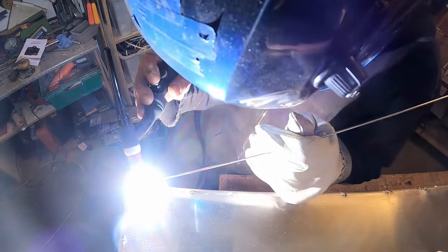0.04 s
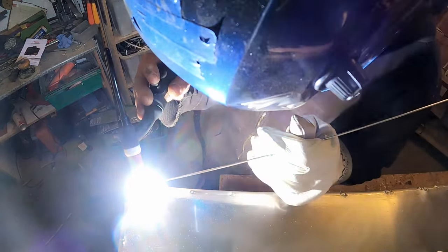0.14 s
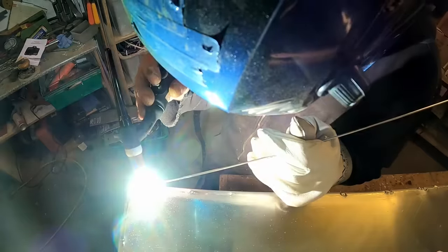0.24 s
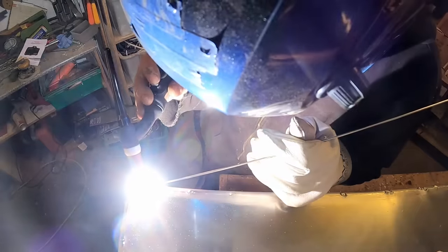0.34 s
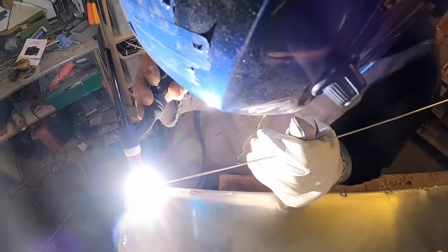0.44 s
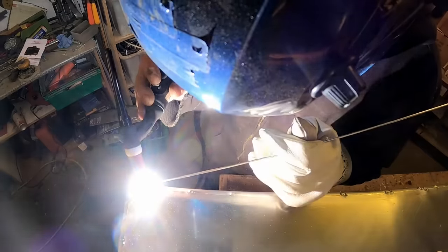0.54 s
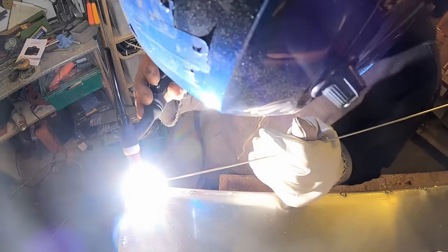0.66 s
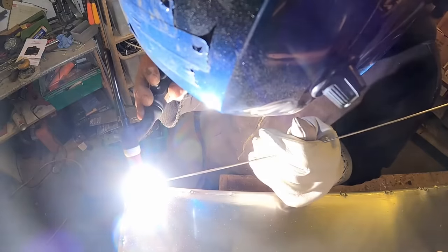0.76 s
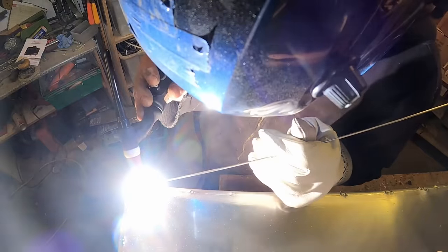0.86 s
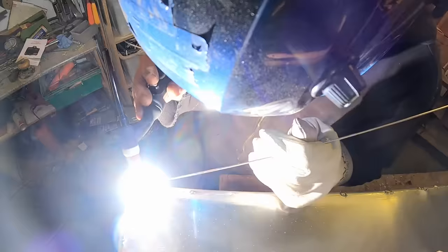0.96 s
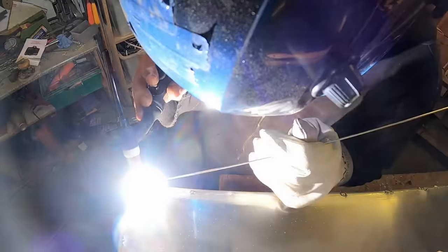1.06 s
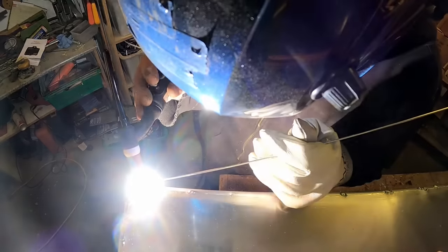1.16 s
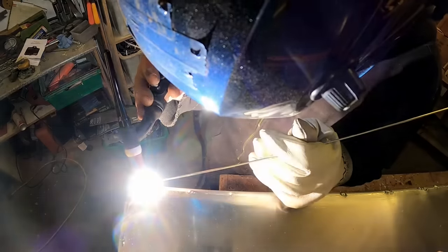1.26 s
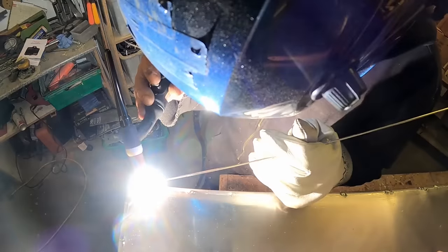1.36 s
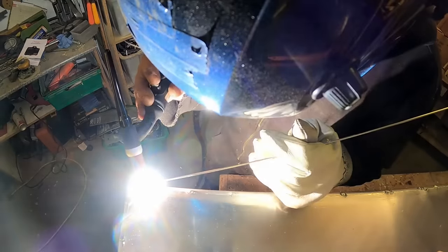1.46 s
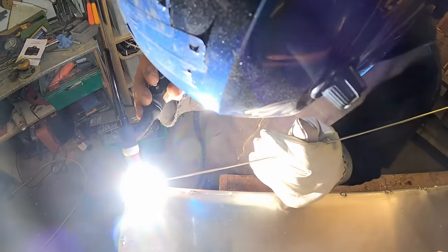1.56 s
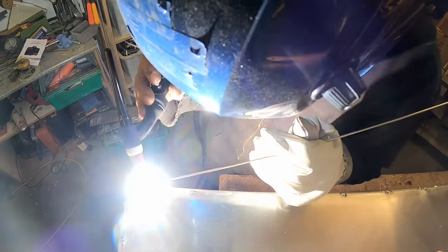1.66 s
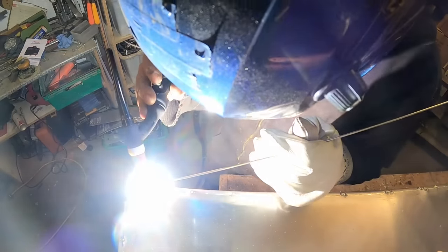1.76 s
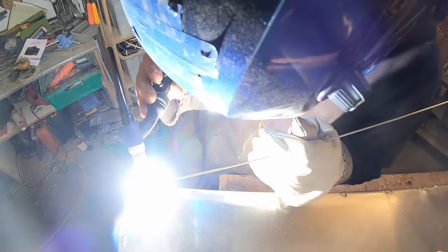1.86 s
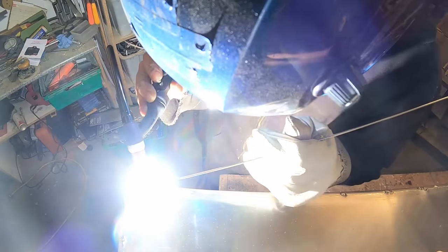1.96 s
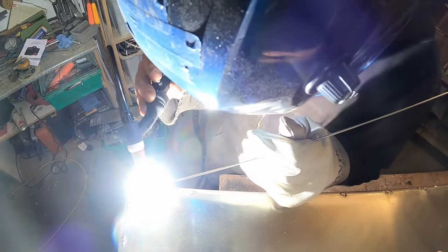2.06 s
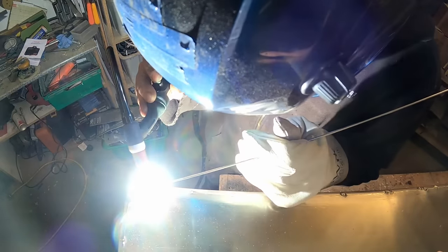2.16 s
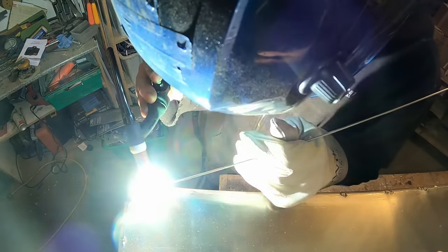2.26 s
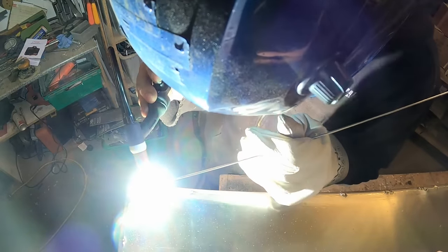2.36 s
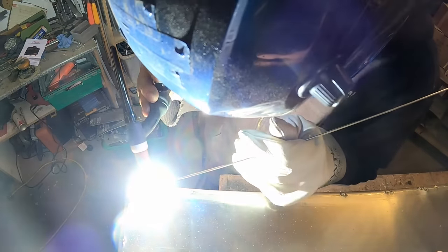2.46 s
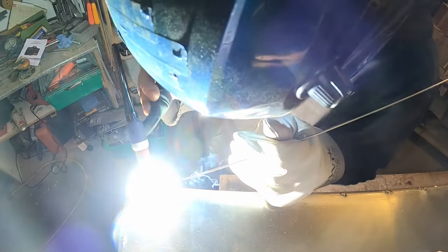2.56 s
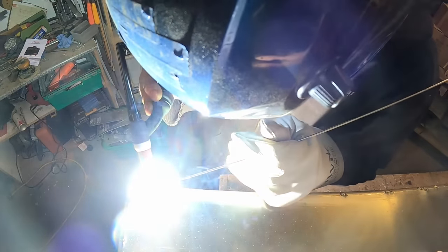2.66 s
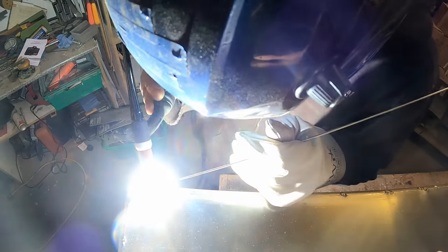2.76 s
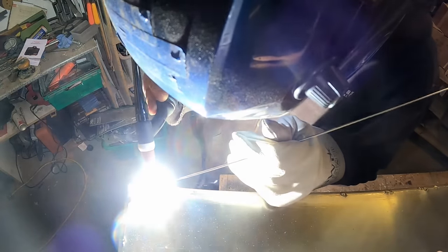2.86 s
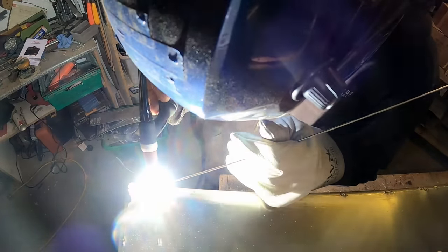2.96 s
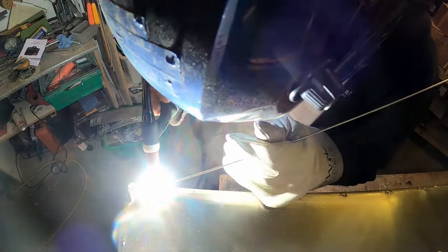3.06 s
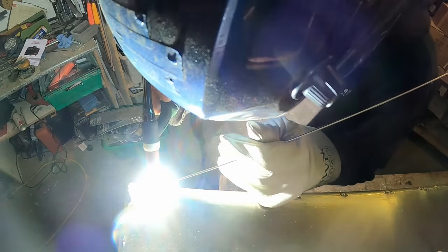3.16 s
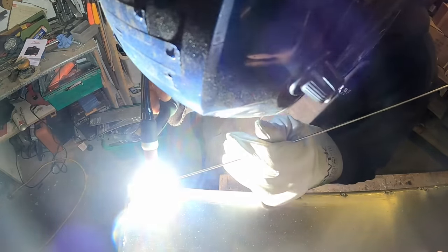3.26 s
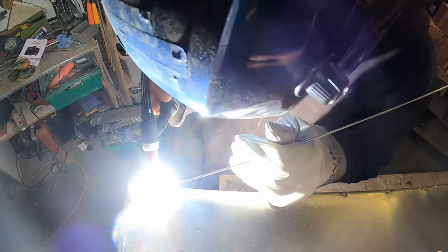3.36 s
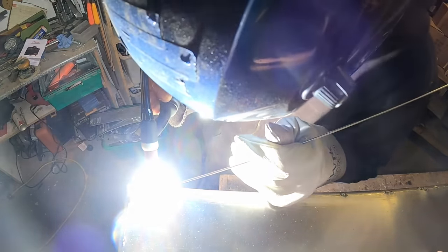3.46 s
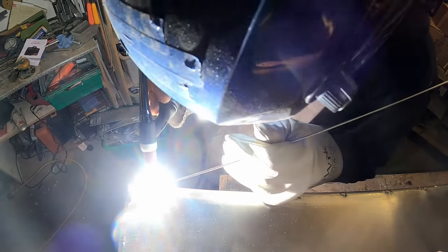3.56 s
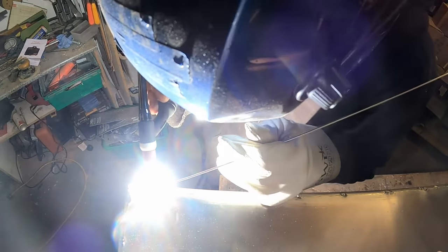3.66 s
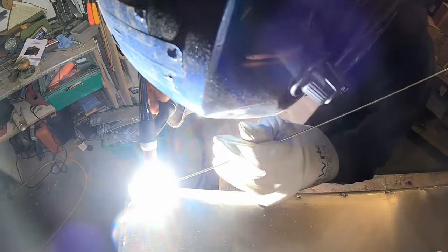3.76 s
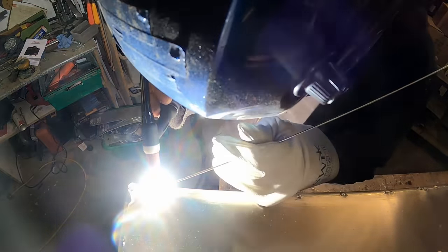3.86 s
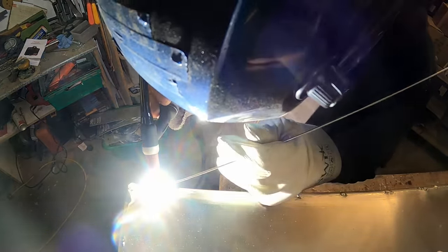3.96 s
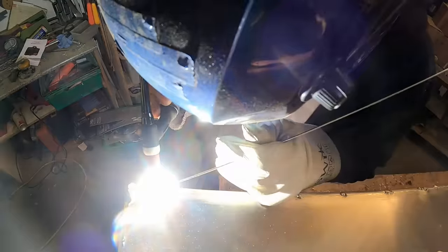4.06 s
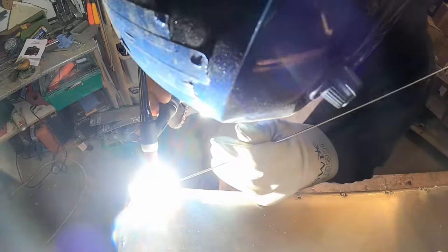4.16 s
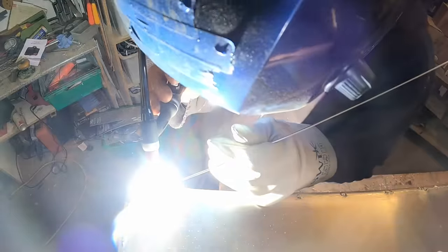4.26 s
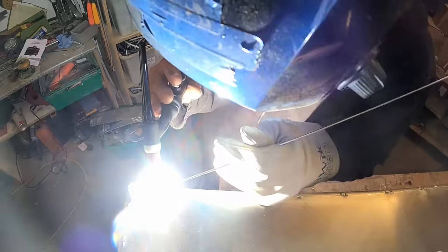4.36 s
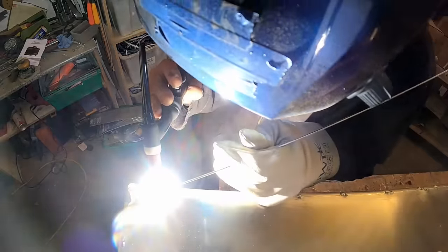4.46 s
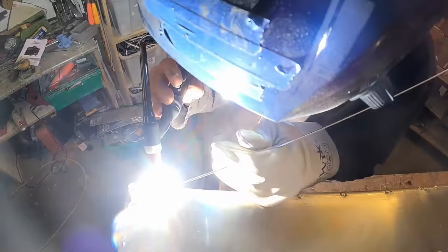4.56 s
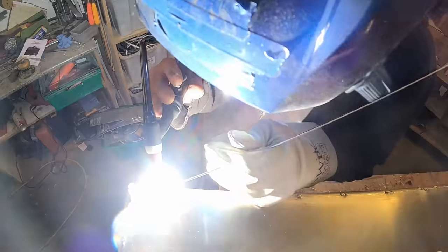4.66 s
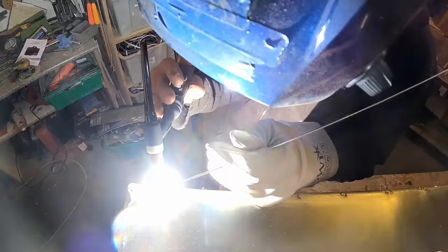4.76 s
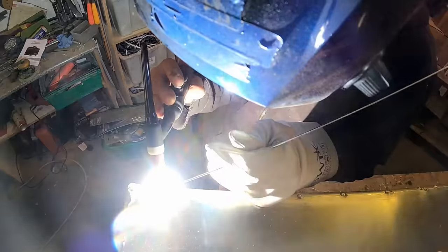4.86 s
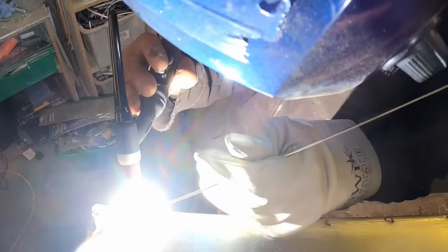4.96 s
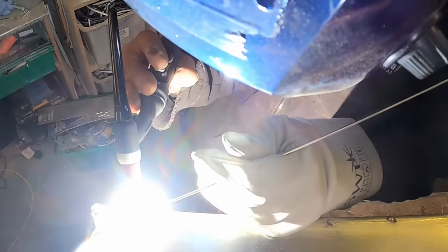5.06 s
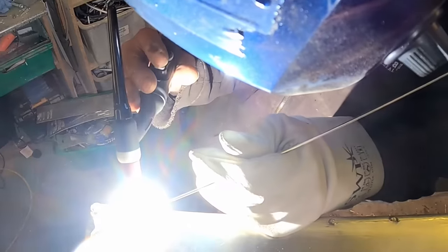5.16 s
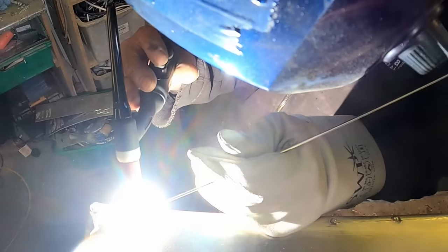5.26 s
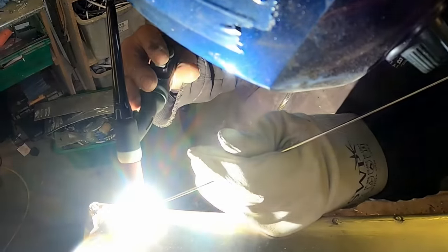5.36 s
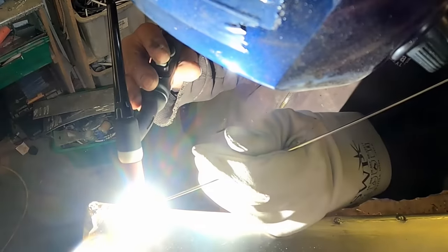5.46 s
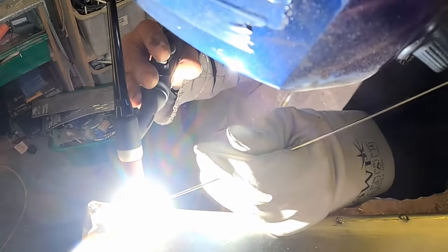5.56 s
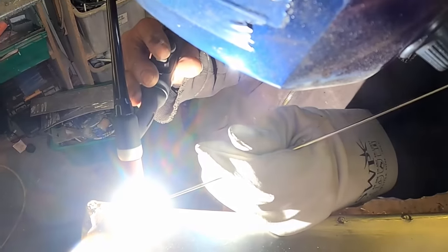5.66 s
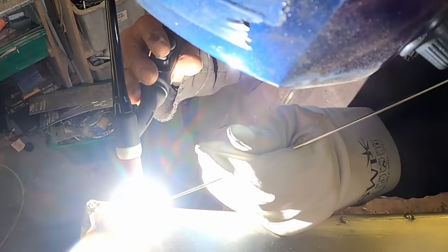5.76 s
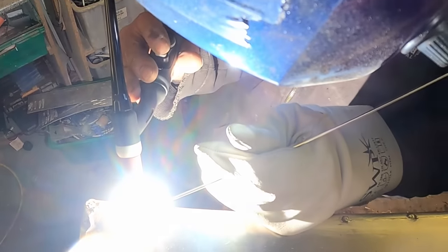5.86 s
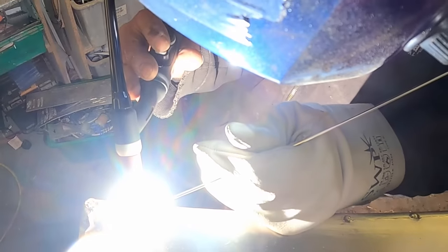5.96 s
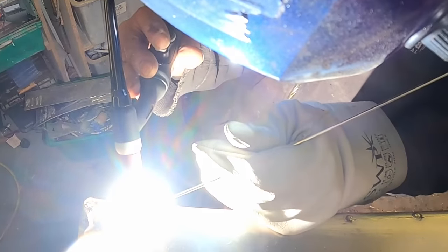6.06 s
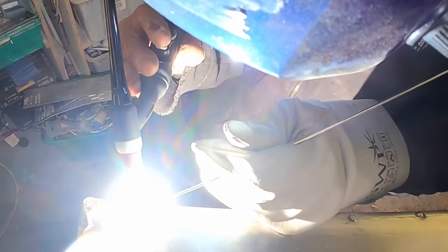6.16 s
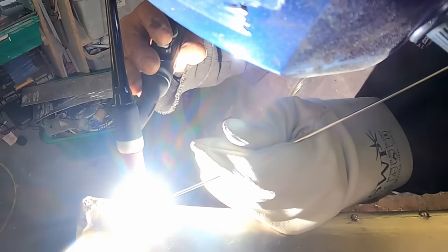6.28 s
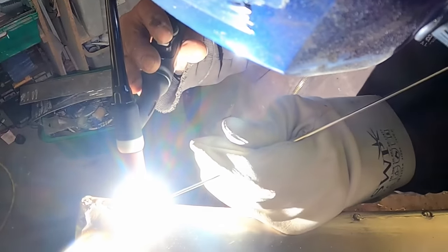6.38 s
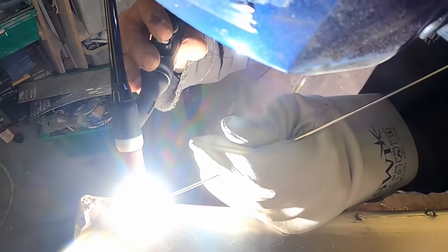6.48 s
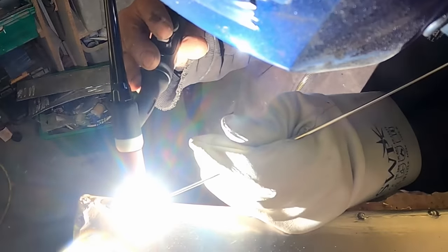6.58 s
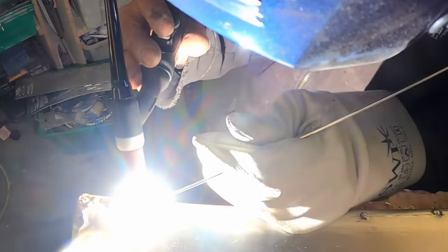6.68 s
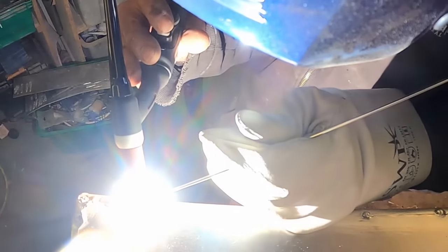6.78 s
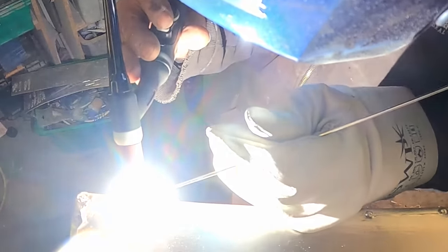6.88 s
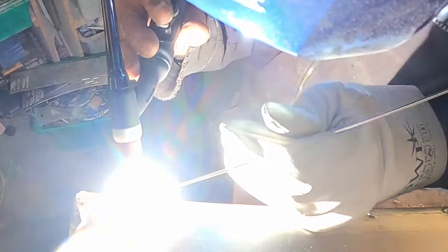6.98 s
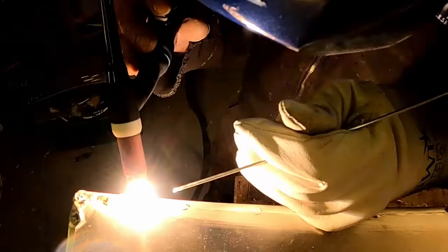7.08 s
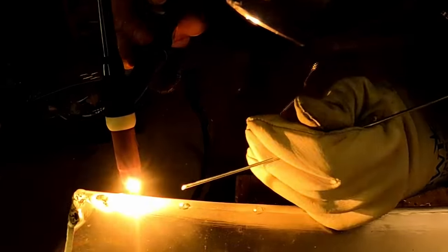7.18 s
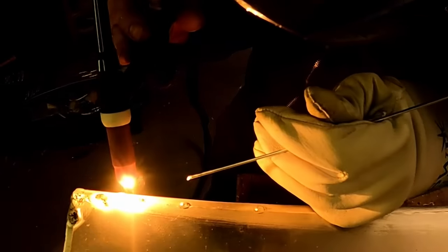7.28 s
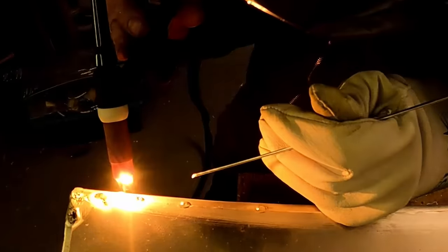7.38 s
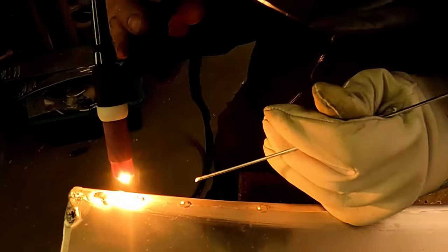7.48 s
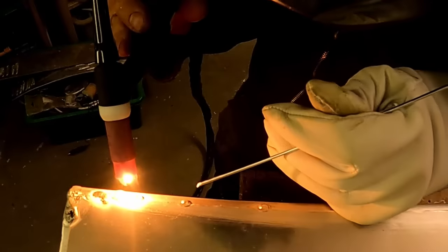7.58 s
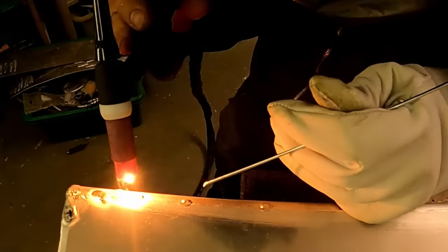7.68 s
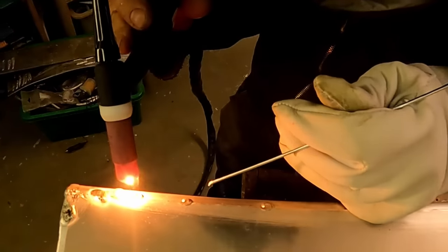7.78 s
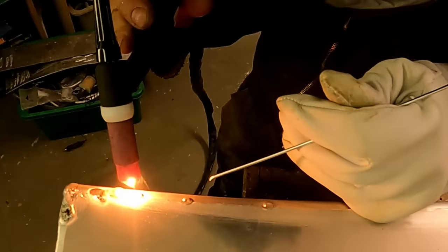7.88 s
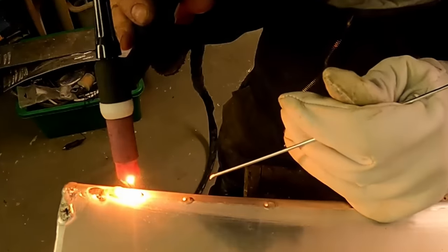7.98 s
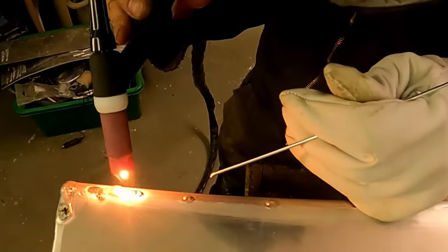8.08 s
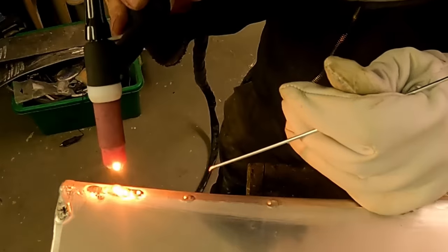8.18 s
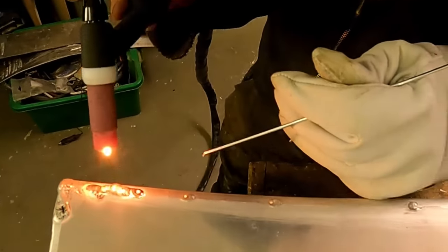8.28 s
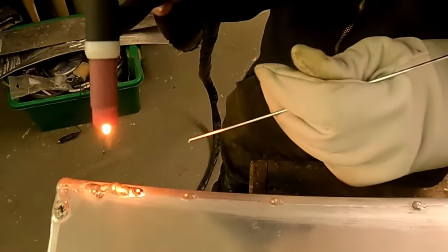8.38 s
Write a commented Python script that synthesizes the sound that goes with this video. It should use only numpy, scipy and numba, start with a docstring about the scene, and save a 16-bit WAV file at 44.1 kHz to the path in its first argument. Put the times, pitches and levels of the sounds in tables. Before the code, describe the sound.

Steady raspy low-pitched arc buzz with sizzling treble runs for seven seconds, cuts dead, and a soft fan whir and airy hiss rise behind it.

```python
"""Aluminium welding arc in a workshop

A phone half a metre from an alternating-current welding arc. The current reverses twice a cycle,
unevenly spaced; each time the arc dies, strikes again and settles, as a chain of pressure steps that cracks.
Plate, nearby surfaces and room filter and echo the cracks; noise bursts make the plasma hiss.
The arc is switched off; the room rings out and gain control lifts the welder's fan and shielding gas."""
import sys
import numpy as np
from scipy import signal
from scipy.fft import rfft, irfft
from scipy.io import wavfile
from scipy.ndimage import uniform_filter1d
from numba import njit

SR = 44100
rng = np.random.default_rng(int(sys.argv[2]) if len(sys.argv) > 2 else 0)


def dump_mix(stems):
    """Bounce the given channels to the path in sys.argv[1] as a 16-bit WAV at rate SR."""
    frames = np.atleast_2d(stems).T  # one column per channel
    limited = np.clip(frames, -1, 1)  # hard clip at full scale
    pcm = np.round(limited * 32767).astype(np.int16)
    wavfile.write(sys.argv[1], SR, pcm)


N = 371763

# Levels are those at the source, ahead of the microphone and its gain control.
ARC_OFF_S = 7.2900
# stretches of steady cycling: (first hard reversal [s], cycle rate [Hz])
CYCLING = [(.009466, 100.3607), (4.9616, 100.3758)]
# arc strength: (time [s], hard reversal [dB], restlessness of the arc root [dB])
ARC = [(0, -11, -2), (.85, -9, -2.5), (1.3, -11, 4.5), (2.06, -8.5, -4), (2.7, -8, -5), (3.2, -9.5, -1),
       (3.7, -8.5, -11), (4.3, -9.5, -4), (5.0, -7, -1), (5.6, -9, -4), (6.2, -9.5, -4), (7.2, -8, -6)]
# arc falters, perhaps as filler rod meets the pool:
# (time [s], length [s], added level of both reversals [dB], added restlessness [dB])
FALTERS = [(.119, 0.11, -0.5, 3), (.29, 0.2, -3, 6.5), (.548, 0.6, -1, 3), (.85, 0.48, -1.5, 2),
           (1.28, 0.44, -0.4, -5.5), (1.693, 0.23, -0.5, 0), (2.172, 0.065, -1.5, 6), (2.245, 0.13, -3, 6),
           (2.29, .16, -2, 9), (2.355, 0.13, -1, 0), (2.401, 0.33, -2.5, 6), (2.56, 0.056, -3, 10),
           (2.69, 0.103, -0.5, 9.5), (2.789, .11, -0.54, 6), (2.939, 0.18, 1, -1), (3.108, 0.11, -0.5, 4),
           (3.317, 0.15, 0.5, 1), (4.174, 0.12, -2, 10), (4.414, .14, -0.5, 5.5), (4.493, 0.11, -1, 6),
           (4.56, 0.17, -2, 5.5), (4.802, 0.28, -2, 1), (4.963, 0.34, -2, 2), (5.162, 0.15, -1.5, -7),
           (5.252, 0.18, -1, 5), (5.521, 0.06, -1.5, 8.5), (5.591, 0.18, -2.5, 7), (6.308, .12, 0, 5),
           (6.378, 0.13, 0, -1), (6.76, 0.14, -1, 7), (6.92, 0.22, -1, 4)]
# torch position: (time [s], edge sharpness [dB], dip where glove and plate shade the arc [Hz],
# dip depth before its limit [0-1], level around 11.8 kHz [dB])
TORCH = [(0, 3, 5800, 0.3, -8), (.36, 3.5, 5900, 0.3, -3), (.5, 3, 5640, 0.1, -1),
         (1.11, 8, 6440, 0.6, -3.5), (1.56, 0, 5730, 0.35, 5), (1.76, -0.5, 5598, 0.3, 2.5),
         (2.5, 5, 5000, 0.6, -4), (2.8, -1.5, 5200, 0.9, -8), (3.2, 3, 5250, 0.8, -2),
         (3.54, 4.5, 4940, 0.4, -12), (3.77, 0.5, 5200, 1, -8), (4.1, -2, 5460, .8, -7),
         (4.3, -4.5, 5700, 1, 0), (4.82, 0.5, 5902, 0.81, 2.5), (5.3, -2, 6000, 0.6, 3),
         (5.6, -3, 6040, 0.6, -4), (5.85, 0, 6000, .65, 4.5), (6.38, -2.5, 6000, 0.3, -3.5),
         (6.96, -1.5, 5860, 0.6, 6), (7.27, 5.5, 5750, 0.47, -4)]
# last sparks as the current runs down: (time [s], size of the main step [dB])
SPARKS = [(7.28275, -15), (7.28575, -19), (7.28935, -10)]


def undb(db):
    """Amplitude ratio of a level in dB."""
    return 10 ** (np.asarray(db) / 20)


def level(x, db):
    """Scale to an RMS level in dB."""
    return x * undb(db) / np.sqrt(np.mean(x ** 2))


def band(x, hz, width):
    """Resonance with gain 1 at its centre."""
    return signal.lfilter(*signal.iirpeak(hz, hz / width, SR), x)


def mode(x, hz, width):
    """A lightly damped mode: gain 1 at its centre, lagging the drive."""
    r, w = np.exp(-np.pi * width / SR), 2 * np.pi * hz / SR
    return signal.lfilter([0, 2 * (1 - r) * np.sin(w)], [1, -2 * r * np.cos(w), r * r], x)


@njit
def svf(x, hz, width):
    """Band-pass whose centre may move every sample."""
    y, b, l = np.empty(len(x)), 0., 0.
    for i in range(len(x)):
        g, k = np.tan(np.pi * hz[i] / SR), width / hz[i]
        v = (b + g * (x[i] - l)) / (1 + g * (g + k))
        b, l, y[i] = 2 * v - b, l + 2 * g * v, k * v
    return y


def colour(x, points, size=2048):
    """Causal filter through (Hz, dB) points, from the folded cepstrum."""
    hz, db = np.transpose(points)
    f = np.maximum(np.arange(size // 2 + 1) * SR / size, 1)
    cepstrum = irfft(np.log(undb(np.interp(np.log(f), np.log(hz), db))))
    cepstrum[1:size // 2] *= 2
    cepstrum[size // 2 + 1:] = 0
    return signal.fftconvolve(x, irfft(np.exp(rfft(cepstrum))))[:len(x)]


def walk(rate):
    """Random levels held 1 / rate s and slewed; spread near 1."""
    k = int(SR / rate)
    return uniform_filter1d(np.repeat(rng.standard_normal(N // k + 1), k), k)[:N]


def column(table, s):
    """Columns of a table whose first column is time, interpolated at times s."""
    t, *rest = np.transpose(table)
    return [np.interp(s, t, c) for c in rest]


def swells(table, s):
    """Each row rises to its values at its time and falls back; where rows overlap the strongest counts."""
    rise_share = 0.36  # of the length
    at, length, *rest = np.transpose(table)[:, :, None]
    late = (s - at) / length
    shape = np.clip(np.minimum(1 + late / rise_share, 1 - late / (1 - rise_share)), 0, 1)
    out = []
    for c in rest:
        strongest = np.abs(c * shape).argmax(axis=0)[None]
        out.append(np.take_along_axis(c * shape, strongest, axis=0)[0])
    return out


def unrest_db(s):
    """Restlessness of the arc root: slow drift plus the falters."""
    return column(ARC, s)[1] + swells(FALTERS, s)[1]


def workshop():
    """Fan blade tone and case resonances over wind and gas hiss, and two faint knocks on the bench."""
    fan_db, fan_waver_db, air_db = -56.5, 2, -47
    blade_hz, blade_db, blade_waver_db = 812, -51.5, 2.5
    # case resonances of the fan: (centre [Hz], width [Hz], mean relative level [dB])
    fan_bands = [(229, 110, -3.5), (462, 30, 0.5), (617, 28, 4), (1630, 56, -4)]
    # spectrum of wind and gas: (frequency [Hz], gain [dB])
    air_spectrum = [(40, -20), (100, -8), (190, -14.5), (600, -2.5), (1200, -5), (3500, -5.5), (6000, -19),
                    (9000, -43.5), (14000, -74)]
    # knocks: (time [s], noise burst level before the bench filter [dB])
    taps = [(7.784, -57), (8.379, -31)]
    fan = 0
    for hz, width, db in fan_bands:
        noise = band(band(rng.standard_normal(N), hz, width), hz, width)
        fan = fan + undb(db + fan_waver_db * walk(16)) * level(noise, 0)
    air = colour(rng.standard_normal(N), air_spectrum) * undb(0.51 * walk(3.6))
    turns = np.cumsum(blade_hz + 4.86 * walk(14)) / SR
    blade = undb(blade_db + blade_waver_db * walk(30)) * np.sin(2 * np.pi * turns)
    blows = np.zeros(N)
    for s, db in taps:
        start = int(s * SR)
        t = np.arange(N - start) / SR
        blows[start:] += undb(db) * undb(-60 * t / 0.2)
    knocks = band(blows * rng.standard_normal(N), 790.0, 630.0)
    knocks = band(band(knocks, 530.0, 1600.0), 900.0, 3000.0)
    return level(fan, fan_db) + blade + level(air, air_db) + knocks


def thumps():
    """Short, dull pushes of air: low tones that die within milliseconds."""
    hz, t60_s = 140, 0.012
    # soft low bumps: (time [s], level before the onset ramp and decay [dB])
    bumps = [(2.239, -47), (2.366, -33), (2.384, -32), (2.652, -20), (2.71, -46), (3.32, -51), (3.819, -48),
             (7.289, -29)]
    out, t = np.zeros(N + SR), np.arange(SR // 4) / SR
    onset = np.minimum(t / 0.0028, 1)
    for s, db in bumps:
        out[int(s * SR):][:len(t)] += undb(db - 60 * t / t60_s) * np.sin(2 * np.pi * hz * t) * onset
    return out[:N]


def rumble():
    """A low, unsteady flutter while the arc burns, stronger when it is restless."""
    steady_db = -56
    t = np.arange(N) / SR
    coarse = t[::441]  # every 10 ms
    unrest = undb(0.62 * np.interp(t, coarse, unrest_db(coarse)))
    burning = np.clip((ARC_OFF_S - t) / 0.018, 0, 1)
    noise = band(rng.standard_normal(N), 66.0, 54.0) * undb(3.8 * walk(5.3))
    return level(band(noise, 72.0, 120.0), steady_db) * burning * unrest


def hum():
    """The lowest tone of the arc, at the cycle rate, swells and fades on its own."""
    # before the microphone port thins it: (time [s], mean level [dB])
    swell = [(0, -48), (1.7, -44), (2.1, -50), (2.9, -57), (3.15, -41), (3.4, -50), (4.2, -49), (4.7, -46),
             (7.2, -50)]
    t = np.arange(N) / SR
    tone = np.sin(2 * np.pi * CYCLING[0][1] * t) * (t < ARC_OFF_S)
    return undb(column(swell, t)[0] + 2.0 * walk(12)) * tone


def room(x, count=60):
    """Diffuse decaying tail, band by band; the arc was burning already, so the room starts full."""
    # workshop reverberation: (centre [Hz], t60 [s], level of the band's tail [dB])
    bands = [(300, .4, -33), (700, .45, -23), (1500, .6, -19), (2500, .5, -17), (4200, .36, -18),
             (6500, .3, -18)]
    t = np.arange(SR) / SR
    tail = 0
    for hz, t60, db in bands:
        noise = band(band(rng.standard_normal(SR), hz, hz), hz, 2 * hz)
        shape = noise * undb(-60 * t / t60) * np.minimum(t / .03, 1)
        tail = tail + undb(db) * shape / np.sqrt(np.sum(shape ** 2))
    # the opening cycles are played once ahead of the start to fill the room
    before = round(count * SR / CYCLING[0][1])
    return signal.fftconvolve(np.r_[x[:before], x], tail)[before:before + N]


def near(x):
    """The half metre to the phone: a dip that moves with the hands, the ringing plate and nearby echoes."""
    dip_most = .72
    helmet_ms, helmet_wander_ms, helmet_share = 0.331, 0.026, 0.37
    # plate and bench: (centre [Hz], width [Hz], gain [dB])
    body = [(1240, 910, 5), (1260, 420, -12.5), (1686, 72, 0), (1980, 250, -1.5), (2510, 740, 4.5),
            (3640, 2060, 6.5), (4490, 210, -4)]
    # modes of plate and workshop that the buzz keeps ringing: (centre [Hz], width [Hz], gain [dB])
    rings = [(602, 4, -6), (903, 4, -6), (1104, 5, -8), (1305, 3.5, -7), (1405, 2.5, -10), (1606, 2.5, -6),
             (1706, 4, -8), (2007, 4, -8), (2308.5, 3.5, -6), (2710, 4, 1), (3312, 4, -4), (3613, 5, -8)]
    # nearby surfaces: (mean delay [ms], share [ratio])
    echoes = [(.6, 0.17), (.82, 0.055), (1.15, 0.011), (1.4, 0.054), (1.65, 0.18), (2.2, 0.01),
              (3.06, 0.15)]
    n = np.arange(N)
    _, dip_hz, depth, air_db = column(TORCH, n / SR)
    x = x - np.clip(depth, 0, dip_most) * svf(x, dip_hz, 1350.0)
    x = x + (undb(air_db) - 1) * band(x, 11800.0, 5200.0)
    out = x + sum(undb(db) * band(x, hz, width) for hz, width, db in body)
    out = out + sum(undb(db) * mode(x, hz, width) for hz, width, db in rings)
    # treble off the welder's helmet, whose distance wanders
    late = (helmet_ms + helmet_wander_ms * walk(1.33)) * SR / 1000
    out = out + helmet_share * np.interp(n - late, n, band(x, 8900.0, 7200.0))
    for ms, share in echoes:
        # moving hands and hot air let each path drift a little
        drift = 2.0 * walk(3.1)  # samples
        out = out + share * np.interp(n - ms * SR / 1000 + drift, n, x)
    return out


def hiss(crack):
    """Turbulent plasma: a short burst of bright noise after every reversal."""
    hiss_db, top_hz, decay_s = -52.5, 8650, 0.0028
    gate = signal.lfilter([1], [1, -np.exp(-1 / (decay_s * SR))], np.abs(crack))
    noise = band(band(rng.standard_normal(N), 3600.0, 5900.0), 5740.0, 4300.0)
    noise = gate * noise * undb(2.0 * walk(14))
    return level(signal.sosfilt(signal.butter(2, top_hz, fs=SR, output="sos"), noise), hiss_db)


def add(out, s, size, spread_ms, count=24):
    """Bell-shaped pressure steps at times s."""
    at = np.round(s * SR).astype(int)[:, None] + np.arange(-count, count)
    ms = 1000 * (at / SR - s[:, None])
    spread = np.clip(spread_ms, .015, .15)[:, None]
    bell = np.exp(-.5 * (ms / spread) ** 2)
    np.add.at(out, np.maximum(at, 0), (at >= 0) * size[:, None] * bell)


def reversal(out, start, size, stages, edge, edge_db, edge_late_s, settle_db):
    """The arc dies, strikes, settles and takes a further small step; an abrupt settling comes sooner and the
    step after it is smaller."""
    early_ms_per_db, after_step_per_db = 0.003, 0.01
    *body, settling, after_step, sharp = stages
    narrowing = edge ** -.15
    ms, step, spread = sharp
    add(out, start + ms / 1000 + edge_late_s, step * size * edge * undb(edge_db), spread + 0 * start)
    for ms, step, spread in body:
        add(out, start + ms / 1000, step * size, spread * narrowing)
    ms, step, spread = settling
    settled = start + (ms - early_ms_per_db * settle_db) / 1000
    add(out, settled, step * size * undb(settle_db), spread * narrowing * undb(-.7 * settle_db))
    ms, step, spread = after_step
    add(out, start + ms / 1000, (step + after_step_per_db * settle_db) * size, spread * narrowing)


def restrikes(out, s, unrest, chance):
    """A restless root dies and strikes once more just after the hard reversal."""
    restrike_db = -20.5
    again = s + rng.uniform(.17, .65, len(s)) / 1000
    size = unrest * undb(restrike_db + np.clip(9.1 * chance, -12, 4)) * np.clip(unrest - .6, .15, 2)
    add(out, again, size, .045 + 0 * s)
    add(out, again - .13 / 1000, -.75 * size, .055 + 0 * s)


def last_sparks(out):
    """Each spark is a main step between two weaker opposite ones."""
    s, db = np.transpose(SPARKS)
    add(out, s, undb(db), 0.036 + 0 * s)
    add(out, s - 0.048 / 1000, -.5 * undb(db), 0.042 + 0 * s)
    add(out, s + 0.17 / 1000, -.4 * undb(db), 0.064 + 0 * s)


def arc():
    """Both reversals of every cycle, with restrikes, then the last sparks; unrest scatters time and size."""
    soft_after_ms, soft_db, soft_wander_db = 3.015, -3, 1.5  # soft reversal against the hard one
    soft_yields = 0.79  # dB lost by the soft reversal per dB of scatter in the hard one's settling
    run_down_s, run_down_db_per_s = 7.236, -105
    # extra sharpness of a hard edge, mean at unrest 1; now and then one is far sharper
    snap_db, snap_most_db = 2.0, 6
    edge_scatter_db, settle_most_db = 2.2, 1.5
    # stages of a reversal, in order dying, striking, settling, after-step, sharp edge: # (time from settling
    # [ms], pressure step [ratio], spread before sharpening [ms])
    hard_stages = [(-0.43, -0.13, 0.037), (-0.19, 0.79, 0.095), (-0.0174, -0.95, 0.046),
                   (0.22, -0.12, 0.063), (0.069, 0.062, 0.026)]
    soft_stages = [(-0.51, -0.31, 0.071), (-0.22, 0.67, .11), (-0.0096, -0.78, 0.048), (0.26, -0.18, 0.15),
                   (0.031, 0.041, 0.019)]
    # the edge of the crack sharpens briefly: (time [s], length [s], added sharpness [dB])
    flares = [(.53, 0.093, 4), (3.18, 0.22, 6), (4.03, 0.61, 9), (5.16, 0.2, 2), (5.55, 0.22, 12),
              (5.85, 0.38, -3)]
    # settling of the hard reversal: (time [s], abruptness [dB], its scatter from cycle to cycle [dB])
    settling = [(0, 0.5, 1.1), (.22, 0.5, 0.5), (.5, -.5, 0.7), (1.0, 0, 0.3), (2.0, -1, 0.4),
                (2.2, -.5, 2), (2.5, -1, 1.5), (2.8, -0.6, 0.4), (3.3, -1.7, 1.8), (3.5, -2.8, .3),
                (3.85, -2, 0.7), (4.0, -0.5, .5), (4.4, -0.5, 0.4), (4.8, -0.6, .6), (5.15, -0.3, 0),
                (5.4, -.5, -0.2), (5.6, 0.4, 0), (5.8, 0.2, -0.7), (7.2, -0.1, .3)]

    (s0, hz0), (s1, hz1) = CYCLING
    first = np.arange(s0 - 1 / hz0, s1 - .005, 1 / hz0)
    second = np.arange(s1, SPARKS[0][0] - .005, 1 / hz1)
    s = np.r_[first, second]

    current_db = column(ARC, s)[0] + run_down_db_per_s * np.maximum(s - run_down_s, 0)
    current_db = current_db + swells(FALTERS, s)[0]
    wander_db = soft_wander_db * walk(7.0)[(s * SR).astype(int)]
    edge = undb(column(TORCH, s)[0] + swells(flares, s)[0])
    unrest = undb(unrest_db(s))
    root = np.sqrt(unrest)
    jitter, hard_luck, soft_luck, restrike_luck, edge_jitter, edge_luck, settle_luck = \
        rng.standard_normal((len(s), 7)).T
    abrupt_db, scatter_db = column(settling, s)
    jump_db = scatter_db * np.clip(settle_luck, -2, 2)
    settle_db = np.minimum(abrupt_db + jump_db, settle_most_db)

    s = s + 4e-6 * root * jitter
    hard = undb(current_db + 0.48 * root * hard_luck)
    soft = undb(current_db + soft_db + wander_db - soft_yields * jump_db + 0.55 * unrest * soft_luck)
    snaps_db = np.minimum(snap_db * root * rng.exponential(size=len(s)), snap_most_db)
    edge_db = edge_scatter_db * root * edge_luck
    edge_late_s = 4e-6 * edge_jitter

    out = np.zeros(N)
    reversal(out, s, hard, hard_stages, edge, edge_db + snaps_db, edge_late_s, settle_db)
    reversal(out, s + soft_after_ms / 1000, soft, soft_stages, edge, edge_db, edge_late_s, 0)
    restrikes(out, s, unrest, restrike_luck)
    last_sparks(out)
    return out


def scene():
    """The arc heard close by and through the room, over the workshop, at two ports."""
    arc_low_hz = 163
    slip_s, slip_ms = 4.9585, 1.451  # from here on all sound arrives a moment late
    # side signal: (frequency [Hz], filter gain from the wavering mid [dB])
    width = [(60, -14), (200, -27), (400, -35), (700, -38), (1300, -57), (2400, -59), (4400, -27),
             (8000, -22), (12000, -7), (15000, 0)]
    crack = arc()
    crack = crack + hiss(crack)
    crack = signal.sosfilt(signal.butter(2, arc_low_hz, "high", fs=SR, output="sos"), crack)
    mid = near(crack) + room(crack) + workshop() + rumble() + thumps() + hum()
    n = np.arange(N)
    mid = mid[n - round(slip_ms * SR / 1000) * (n > slip_s * SR)]
    # the two ports hear almost the same; what differs is faint, wavering and mostly treble
    side = colour(mid * walk(50), width)
    return np.array([mid + side, mid - side])


@njit
def follow(x, start, attack, release):
    """Peak follower: quick up, falling at a steady rate in dB."""
    e, out = start, np.empty(len(x))
    for i in range(len(x)):
        e = e + attack * (x[i] - e) if x[i] > e else e * release
        out[i] = e
    return out


def record(dry):
    """Port colour, gain control that creeps up once the sound drops, band limit."""
    top_hz = 15750
    # microphone behind its port: (frequency [Hz], gain [dB])
    mic = [(20, -10), (50, -20), (100, -17), (170, 4), (300, 6.5), (420, -1), (600, -1), (700, -4),
           (800, -3.5), (1000, -7), (1300, -5.5), (1800, -7.5), (2100, -5), (2500, -5.5), (3000, -7),
           (4600, -2), (5000, -4), (7200, 5), (8300, 3), (8700, -2), (9150, -10), (9400, 15), (9700, 13),
           (10600, 7.5), (11300, 14), (13000, 7), (14500, 1.5), (16000, -13)]
    x = np.array([colour(c, mic) for c in dry])
    # RMS over the last 40 ms
    loud = np.sqrt(uniform_filter1d(x.mean(0) ** 2, size=1764, origin=881) + 1e-12)
    hold = float(undb(-23.))  # loudness at which the gain is 1
    release = float(undb(-17. / SR))  # the follower falls 17 dB per second
    gain = np.sqrt(hold / follow(loud, hold, 1 / 500, release))  # evens out half the change in dB
    return signal.sosfilt(signal.ellip(12, .2, 80, top_hz, fs=SR, output="sos"), x * gain)


dry = scene()
out = record(dry)
dump_mix(out)
```